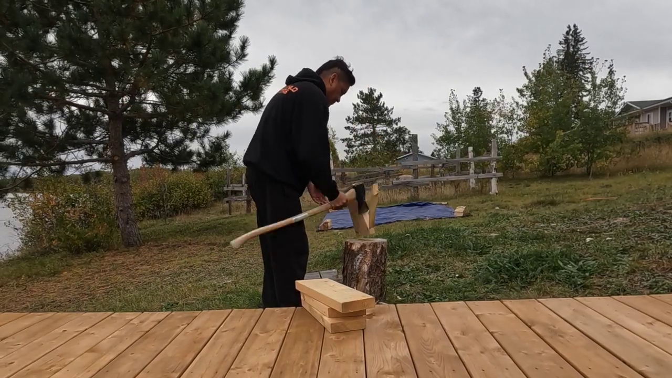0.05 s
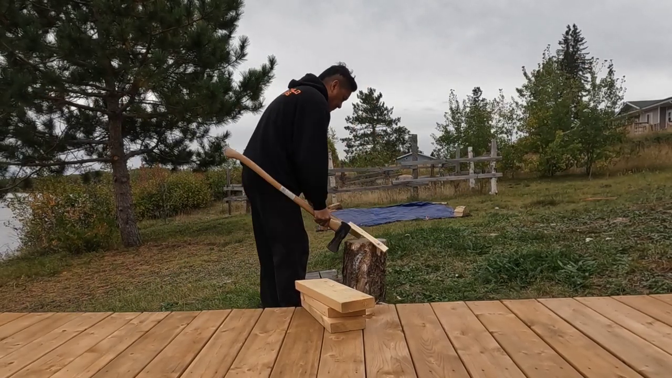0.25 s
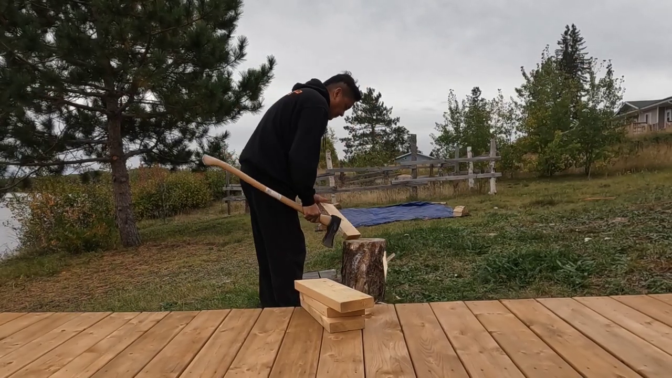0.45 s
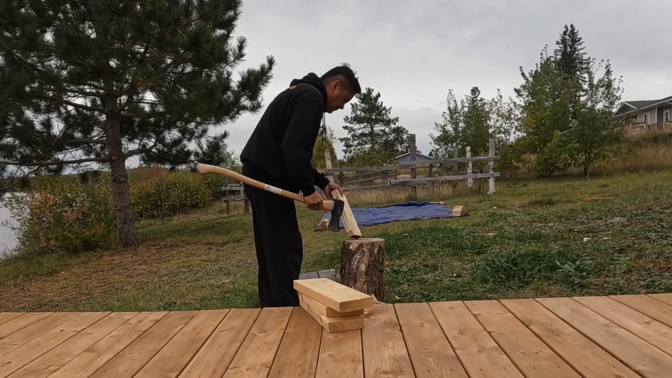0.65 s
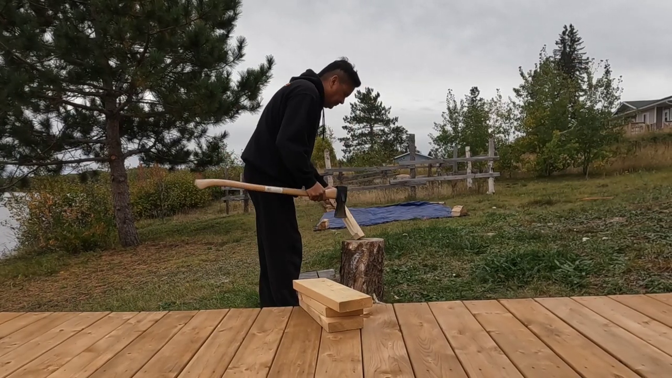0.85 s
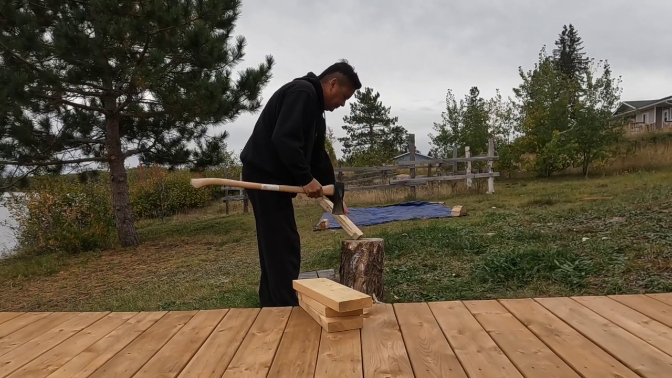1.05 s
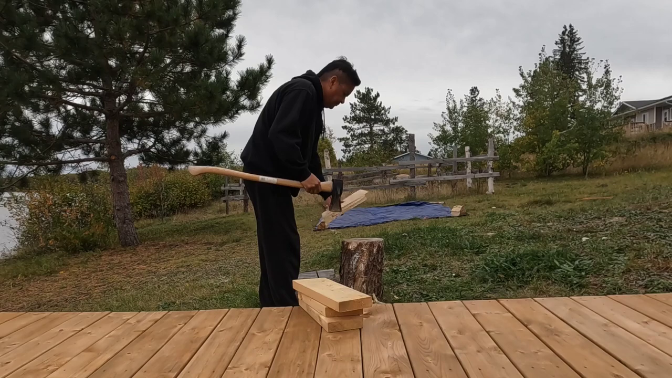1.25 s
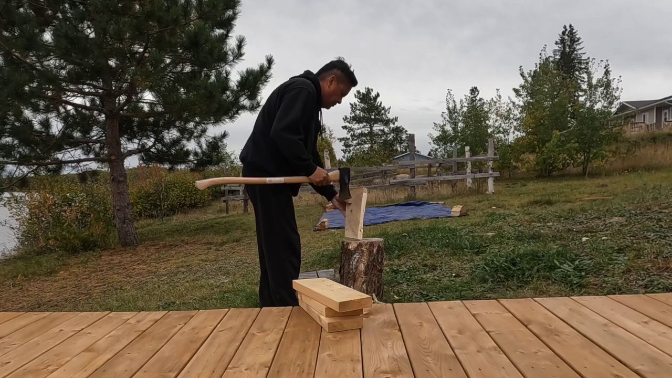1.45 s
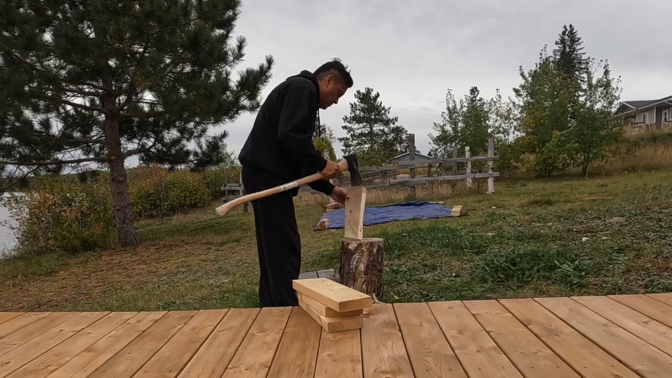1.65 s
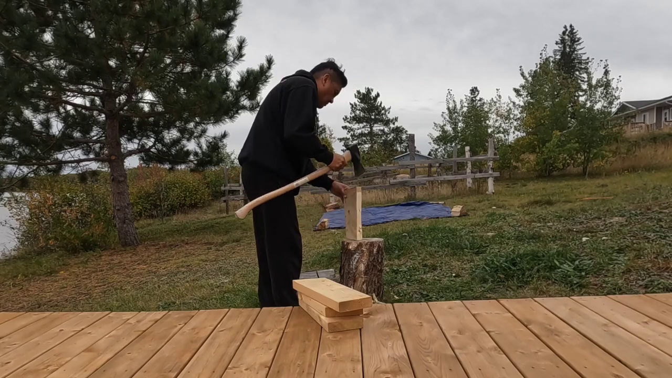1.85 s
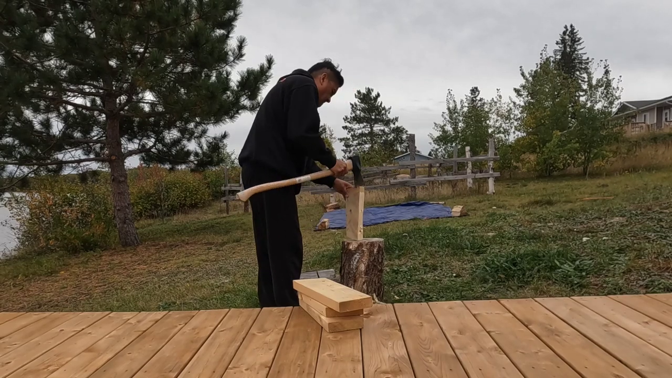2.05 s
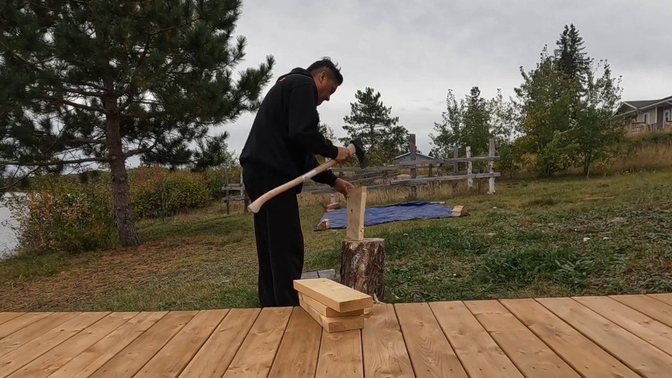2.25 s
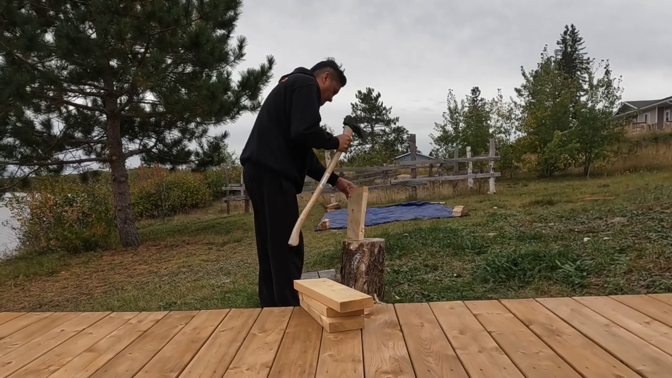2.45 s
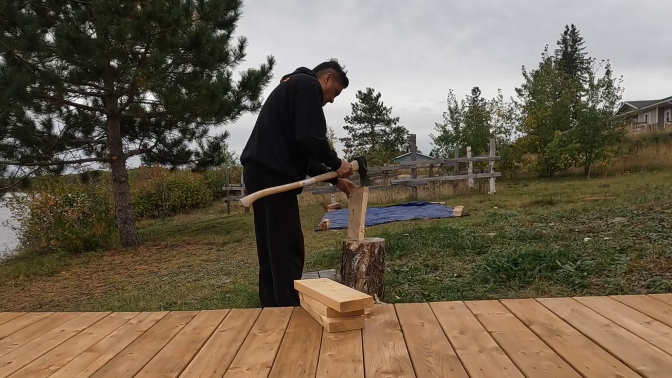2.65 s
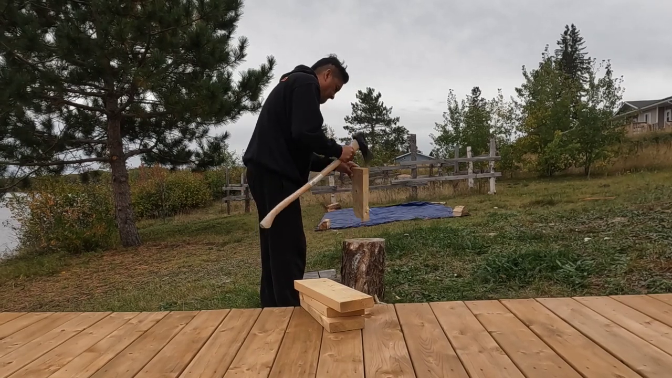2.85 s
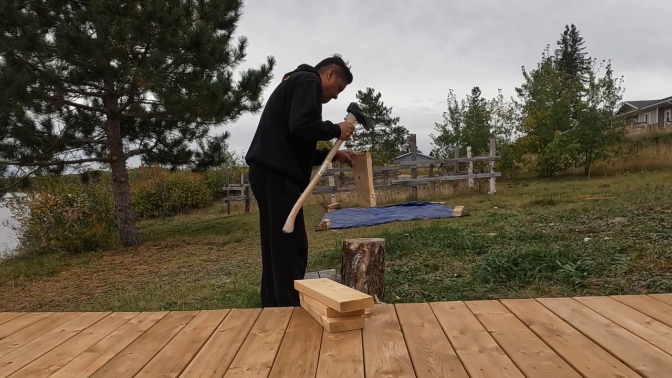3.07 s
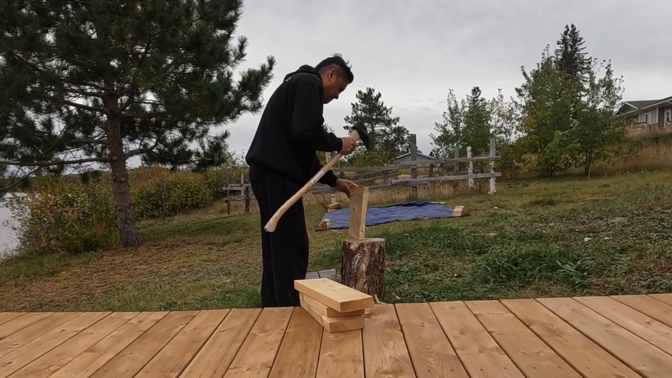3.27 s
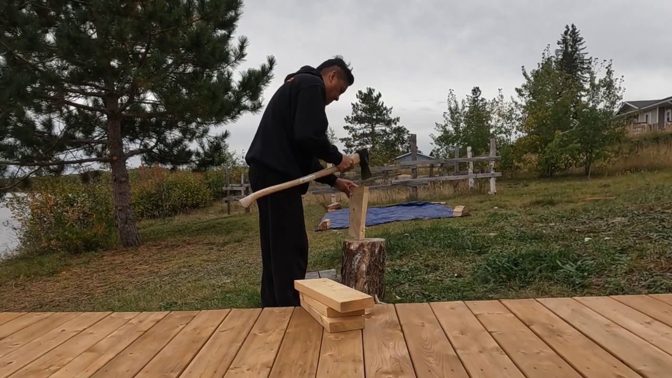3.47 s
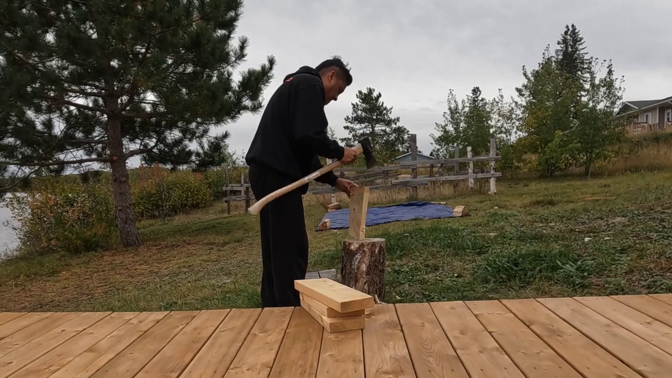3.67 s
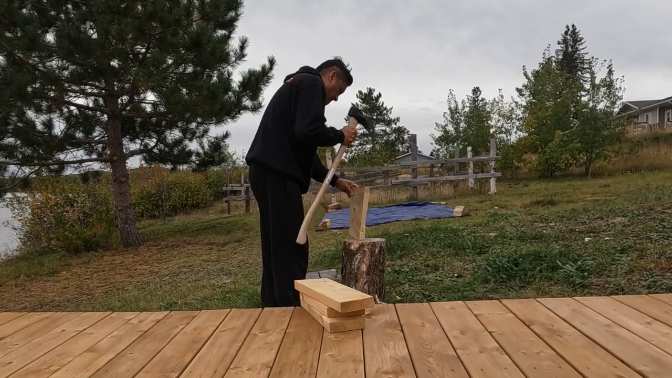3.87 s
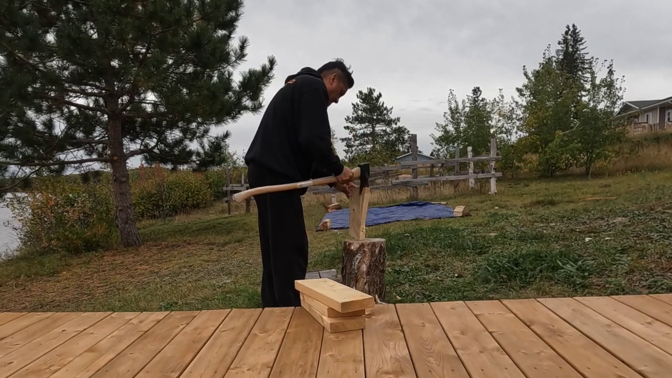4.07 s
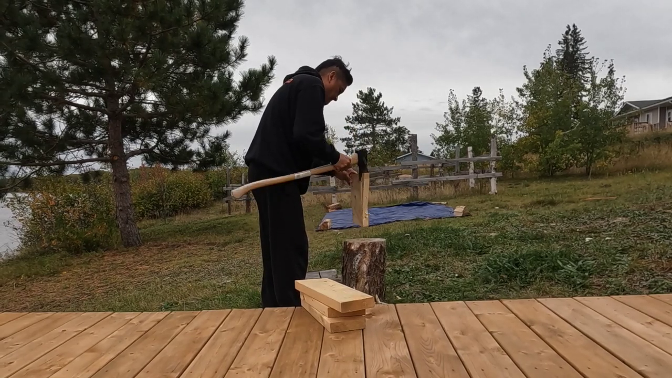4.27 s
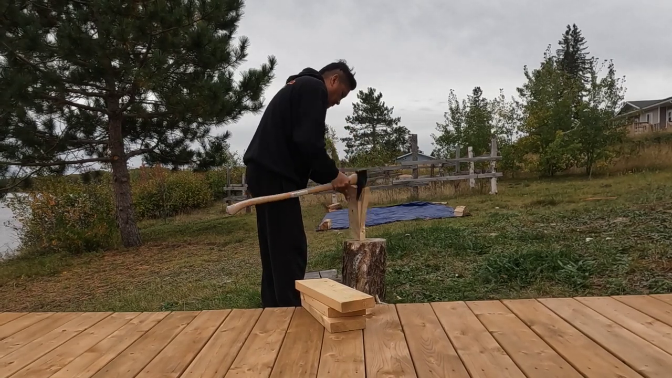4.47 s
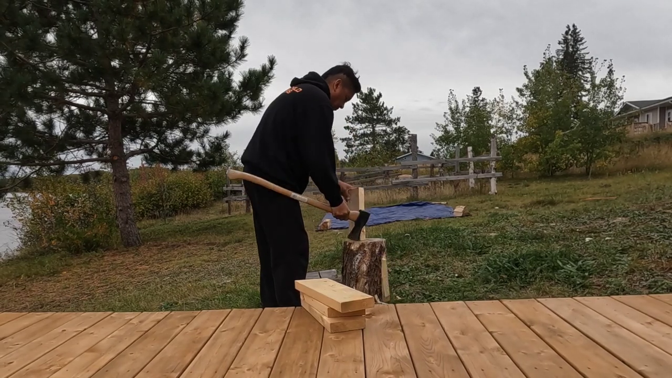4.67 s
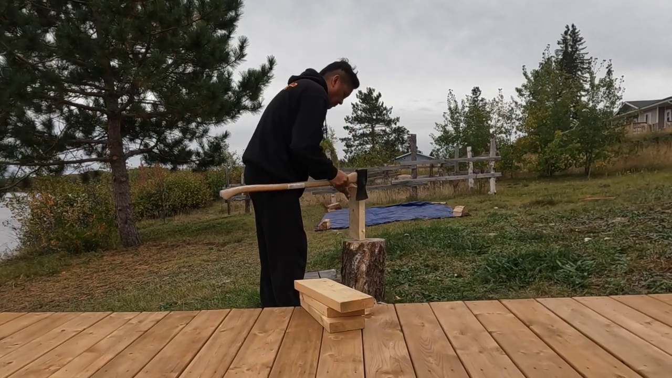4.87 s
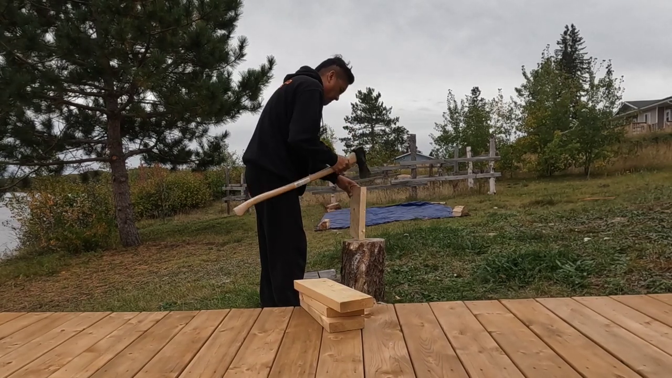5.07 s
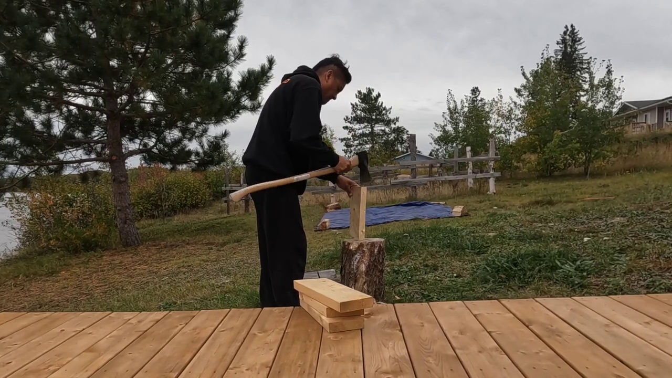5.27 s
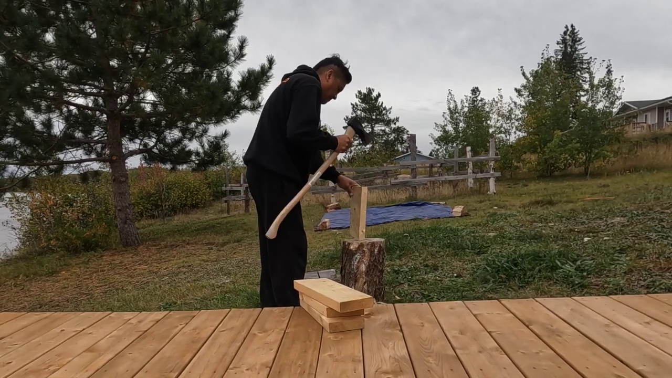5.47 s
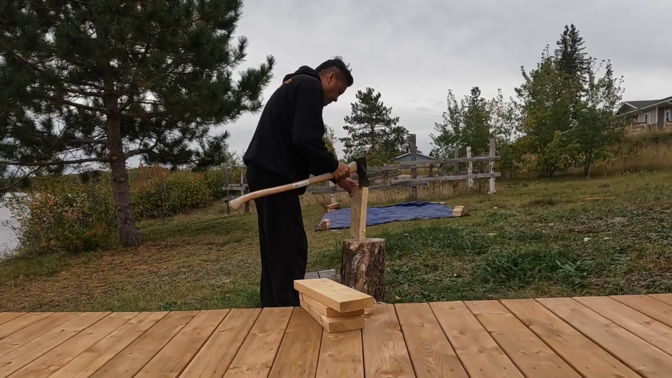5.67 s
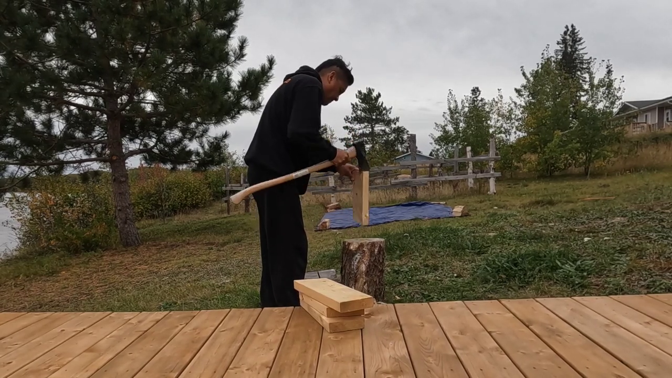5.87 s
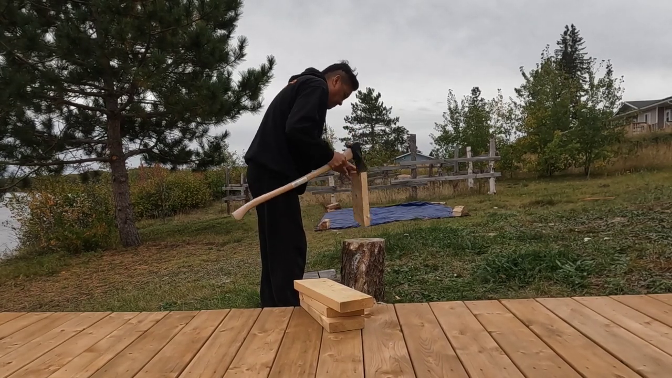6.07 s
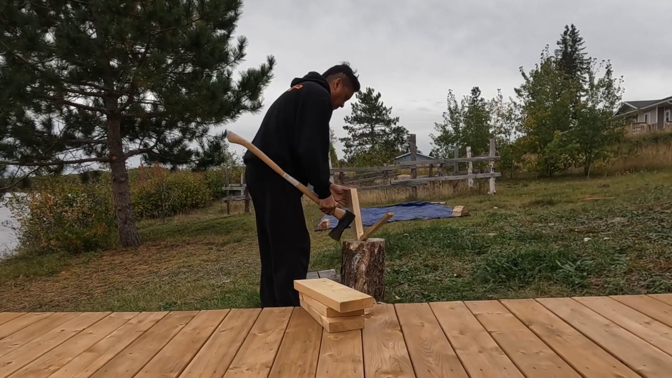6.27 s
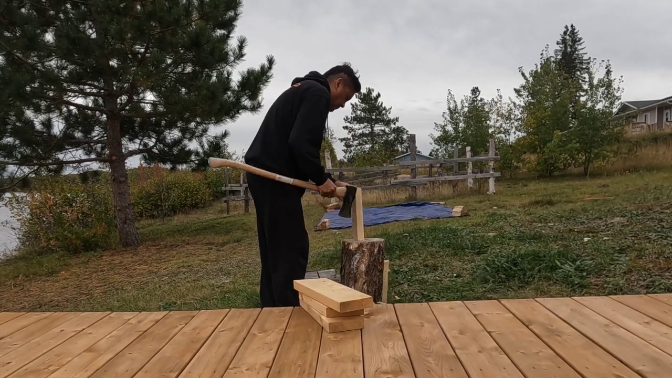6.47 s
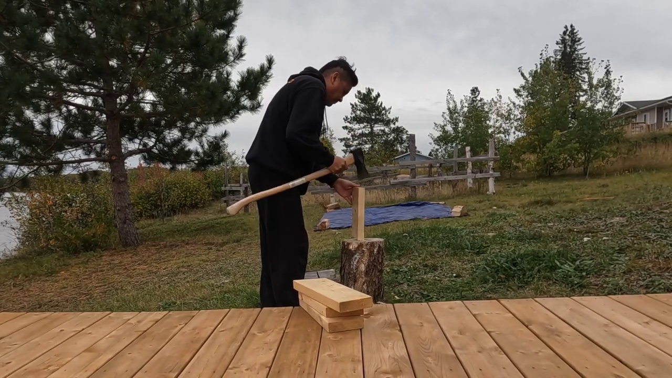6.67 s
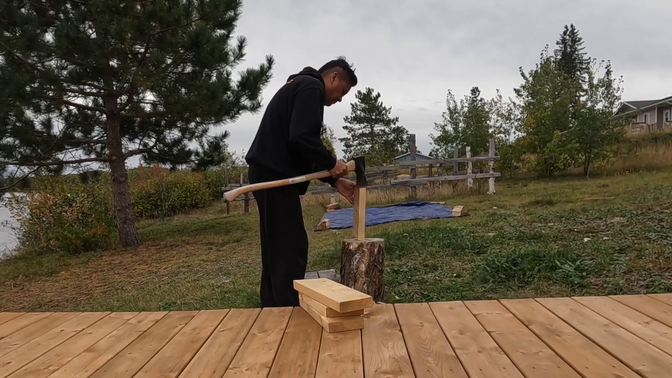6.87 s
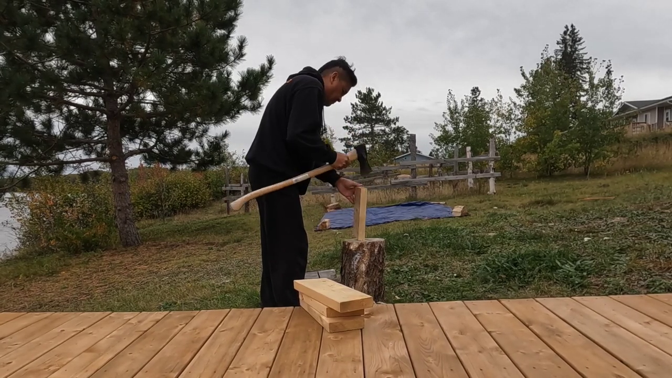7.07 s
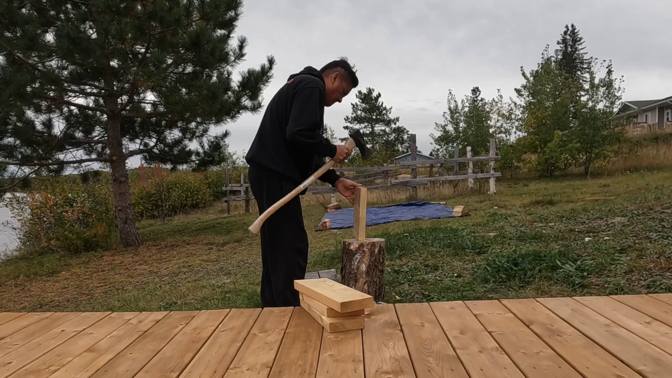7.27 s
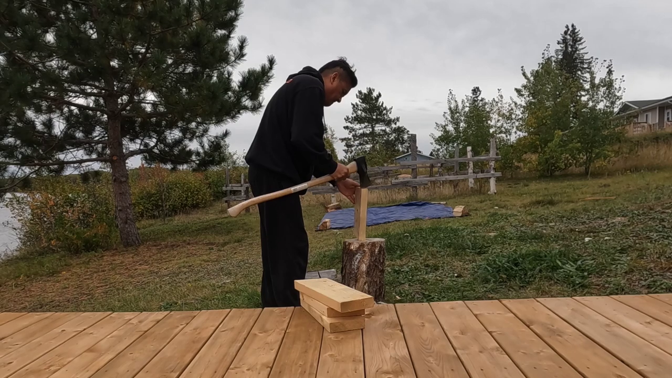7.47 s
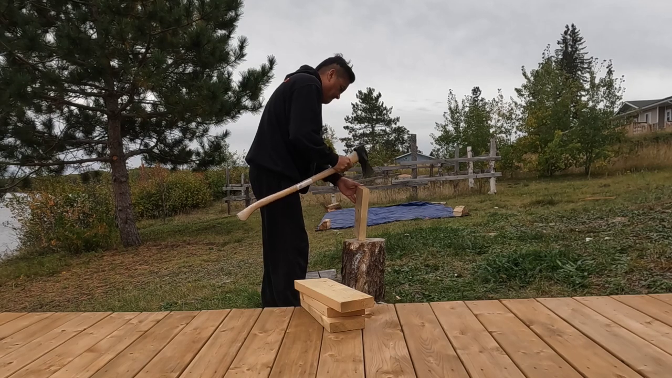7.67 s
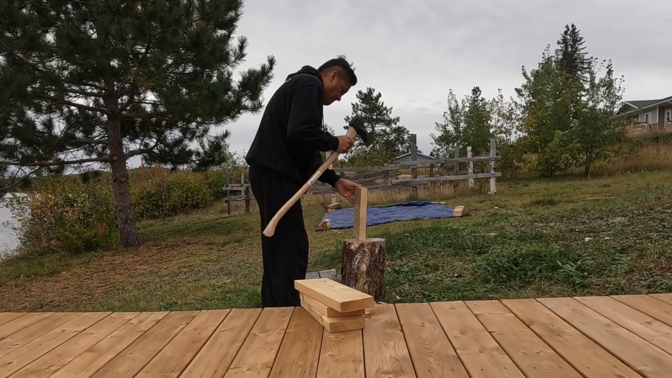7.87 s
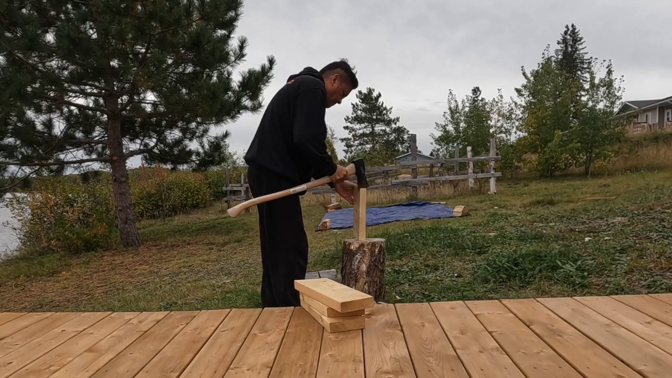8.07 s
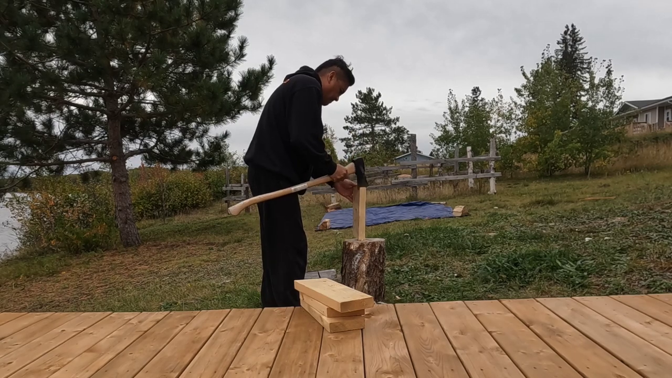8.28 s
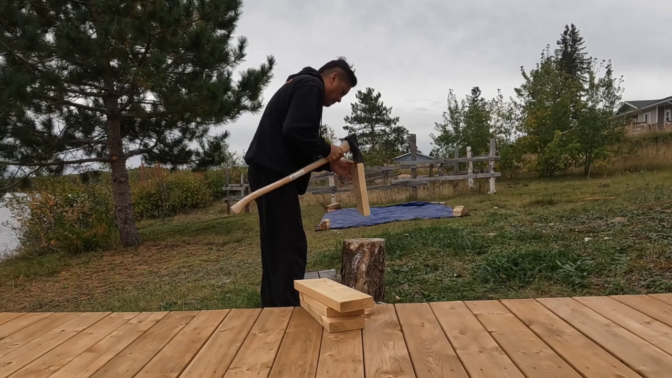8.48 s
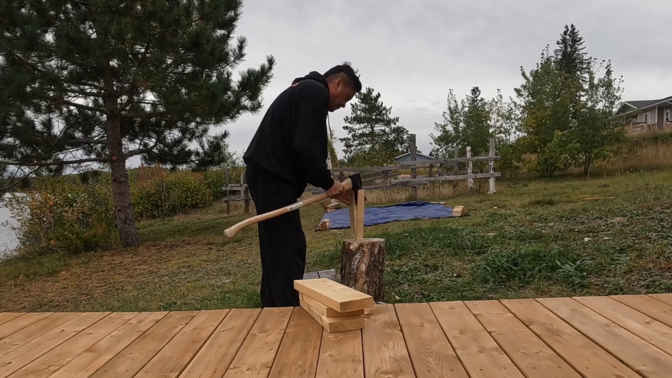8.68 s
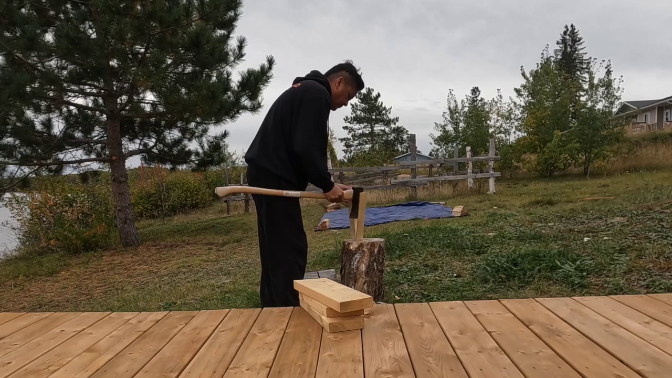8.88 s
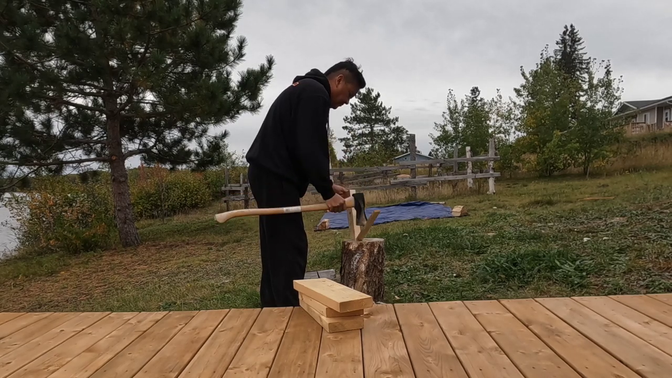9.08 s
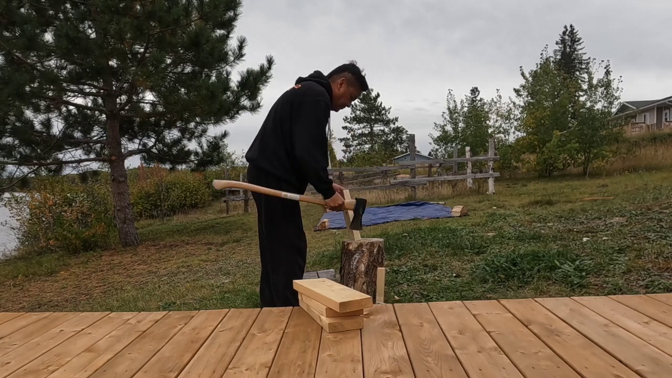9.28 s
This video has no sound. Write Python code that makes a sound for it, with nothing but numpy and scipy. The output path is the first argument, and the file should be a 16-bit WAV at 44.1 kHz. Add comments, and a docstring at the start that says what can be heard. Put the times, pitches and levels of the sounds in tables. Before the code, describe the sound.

Close, dry outdoor wood chopping with only thin scattered reflections. At about 0.15 s a hard full-bodied crack splits the board, with a short rasp and faint steel ring; pieces clatter until 0.7. Light taps, soft thuds and rustling fill 0.9-2.3 as wood is handled. A crisp bite lands at 2.7, a clack and dry rub at 3.0, then a duller knock at 3.6. A brighter splitting crack comes at 4.15, another at 4.6, followed by loud clacking and thuds to 5.0. A tap at 5.25 and a chop at 5.75 lead to a sharp split at 6.2 and a ringing stick knock at 6.6. Drier blows fall at 7.5 and 8.15, then a strong splintering crack at 8.75, with pieces tumbling and a bright clack near 9.1. Low uneven rumble and ground thumps continue beneath; the sound starts mono and gradually widens after 3.5.

```python
"""Outdoors, beside a wooden deck: an axe splits a dry board into kindling on a stump.
Chops, splits and clacks are dying swarms of noise snaps that drive resonators at the wood's modes.
Thumps are swept low sines plus shuddering noise, thuds are short cosine swings, a steel ring is decaying sines.
Rasps, rustle, hush, rumble and soft bumps are coloured noise under level curves; sparse outdoor scatter
answers the wood hits."""
import sys
import numpy as np
from scipy import signal
from scipy.fft import rfft, irfft, next_fast_len
from scipy.io import wavfile

SR = 44100
rng = np.random.default_rng(int(sys.argv[2]) if len(sys.argv) > 2 else 0)


def file_out(sig):
    """Save sig as 16-bit WAV at sys.argv[1]."""
    # one column per channel
    cols = np.atleast_2d(sig).T
    # limit, then scale
    lim = np.clip(cols, -1, 1)
    pcm = np.round(lim * 32767).astype(np.int16)
    wavfile.write(sys.argv[1], SR, pcm)


N = 411435
TIME = np.arange(N) / SR


def from_db(db):
    """dB to amplitude factor."""
    return 10 ** (np.asarray(db) / 20)


def rms_one(x):
    """Scale to rms 1."""
    return x / np.sqrt(np.mean(x ** 2) + 1e-20)


def add(track, s, sound):
    """Mix a sound in from time s."""
    at = round(s * SR)
    track[..., at:at + sound.shape[-1]] += sound[..., :N - at]


def band(x, low_hz, high_hz):
    """Band-pass, Butterworth."""
    return signal.sosfilt(signal.butter(2, [low_hz, high_hz], "band", fs=SR, output="sos"), x)


def resonate(x, hz, width_hz):
    """Two-pole resonance, about unity gain at its peak."""
    r = np.exp(-np.pi * width_hz / SR)
    feedback = [1, -2 * r * np.cos(2 * np.pi * hz / SR), r * r]
    return signal.lfilter(np.array([1, 0, -1]) * (1 - r * r) / 2, feedback, x)


def coloured(x, colour):
    """Shape a noise by a dB curve over log frequency; rms 1."""
    hz, db = np.transpose(colour)
    size = next_fast_len(x.shape[-1])
    f = np.maximum(np.fft.rfftfreq(size, 1 / SR), 1)
    gain = from_db(np.interp(np.log(f), np.log(hz), db, left=-90, right=-90))
    return rms_one(irfft(rfft(x, size) * gain, size)[..., :x.shape[-1]])


def stereo_noise(colour, side_db, grain_db=0):
    """Mid/side noise with a weaker side; uneven grain makes it crackle."""
    grain = from_db(grain_db * rng.standard_normal(N))
    mid, side = coloured(rng.standard_normal((2, N)) * grain, colour)
    return rms_one(mid + from_db(side_db) * side * np.array([[1], [-1]]))


def flutter(per_s, depth_db):
    """Random gain: per_s new values a second, joined by lines, depth_db scales them."""
    steps = rng.standard_normal(N)
    return from_db(depth_db * np.interp(TIME * per_s, np.arange(N), steps))


SWELLS_PER_S, SWELL_DB = 10, 3
RUMBLE_GAIN_DB, BUMP_GAIN_DB = 6, 7
# deep rumble spectrum: (f/Hz, relative level/dB)
RUMBLE_SPECTRUM = [(15, -1.5), (30, 0.5), (50, -4.5), (75, -6.5), (110, -12.5), (170, -42)]
# deep rumble curve: (t/s, level/dB before RUMBLE_GAIN_DB)
RUMBLE_LEVEL = [(0.0, -48.5), (0.28, -46), (0.8, -59.5), (1.12, -36), (1.35, -50), (2.6, -44),
                (3.38, -61.5), (3.63, -51), (4.41, -46), (4.65, -39.5), (6.42, -47.5), (6.55, -47.5),
                (7.38, -50), (7.67, -38.5), (8.18, -47), (8.39, -36), (8.94, -39.5), (9.33, -38.5)]


def rumble():
    """Deep noise in uneven swells."""
    level = from_db(np.interp(TIME, *np.transpose(RUMBLE_LEVEL)) + RUMBLE_GAIN_DB)
    return level * flutter(SWELLS_PER_S, SWELL_DB) * stereo_noise(RUMBLE_SPECTRUM, side_db=-8.0)


# soft bumping spectrum: (f/Hz, relative level/dB)
BUMP_SPECTRUM = [(50, -9), (90, -7), (130, -6), (200, -12.5), (300, -22), (550, -37.5), (1000, -58.5)]
# soft bumping curve: (t/s, level/dB before BUMP_GAIN_DB)
BUMP_LEVEL = [(0.0, -66.5), (0.26, -57), (0.96, -68), (1.14, -48), (1.38, -60.5), (2.73, -62.5),
              (3.22, -68), (4.81, -57), (5.53, -65.5), (6.18, -69), (6.83, -60.5), (7.4, -73),
              (7.72, -63.5), (7.97, -63.5), (8.91, -55), (9.33, -71)]


def soft_bumps():
    """Low noise in uneven swells."""
    level = from_db(np.interp(TIME, *np.transpose(BUMP_LEVEL)) + BUMP_GAIN_DB)
    return level * flutter(SWELLS_PER_S, SWELL_DB) * stereo_noise(BUMP_SPECTRUM, side_db=-5.0)


HUSH_DB = -69
# spectrum of foliage, grass and cloth: (f/Hz, relative level/dB)
RUSTLE_SPECTRUM = [(290, -40), (500, -8.5), (1030, -2), (1480, 1.5), (1640, -1), (1870, -3.5), (2040, -4),
                   (2160, -3), (4600, -7), (7310, -11.5), (9090, -24), (12300, -13.5), (16000, -36.5)]


def hush():
    """Steady noise of foliage."""
    return from_db(HUSH_DB) * stereo_noise(RUSTLE_SPECTRUM, side_db=-1.5)


RUSTLE_ATTACK_S, RUSTLE_RELEASE_S, RUSTLE_GAIN_DB = 0.021, 0.063, -3.5
# pieces are handled or fall: (start t/s, length/s, level/dB before RUSTLE_GAIN_DB)
RUSTLE_EVENTS = [(0.249, .27, -59), (0.721, 0.11, -58.5), (1.274, 0.96, -66), (2.542, 0.53, -68),
                 (4.225, 0.91, -62.5), (5.416, .24, -63.5), (5.951, 0.69, -67), (8.949, 0.46, -54.5)]


def rustle():
    """Clothes and grass: crackling noise, held for each event, then released exponentially."""
    stir = np.zeros(N)
    for s, length_s, db in RUSTLE_EVENTS:
        attack = np.clip((TIME - s) / RUSTLE_ATTACK_S, 0, 1)
        release = np.exp(-np.maximum(TIME - s - length_s, 0) / RUSTLE_RELEASE_S)
        stir += from_db(db) * attack * release
    noise = stereo_noise(RUSTLE_SPECTRUM, side_db=-3.0, grain_db=6.5)
    return from_db(RUSTLE_GAIN_DB) * stir * flutter(per_s=45, depth_db=5) * noise


# scatter from deck, grass and trees: (f/Hz, relative level/dB)
SCATTER_SPECTRUM = [(150, -7), (500, -3.5), (900, -12), (1400, -8.5), (3400, -4.5), (7000, 0), (10000, 5),
                    (15000, -10.5)]


def yard(x, wet_db=-22, t60_s=0.33, treble_t60_s=.14, onset_s=0.0035, echo_db=-30, echo_s=0.043):
    """Thin scatter, partly different per ear, plus a blurred wall echo; grass and leaves swallow treble first."""
    t = TIME[:SR // 2]
    sparse = rng.standard_normal((3, len(t))) * from_db(7 * rng.standard_normal(len(t)))
    echoes = coloured(sparse[:2] + sparse[2], SCATTER_SPECTRUM)   # the third noise is common to both ears
    echoes = echoes * flutter(per_s=480, depth_db=5.0)[:len(t)]
    dull = signal.sosfilt(signal.butter(2, 4200, fs=SR, output="sos"), echoes)
    bright = signal.sosfilt(signal.butter(2, 4200, "high", fs=SR, output="sos"), echoes)
    decaying = dull * from_db(-60 * t / t60_s) - bright * from_db(-60 * t / treble_t60_s)
    scatter = decaying * (1 - np.exp(-t / onset_s))
    wall = dull * np.exp(-((t - echo_s) / 0.0035) ** 2)
    response = from_db(wet_db) * scatter / np.linalg.norm(scatter[0])
    response = response + from_db(echo_db) * wall / np.linalg.norm(wall[0])
    return signal.fftconvolve(x[None], response, axes=1)[:, :N]


# feet and falling sticks on the turf: (t/s, relative level/dB, f/Hz)
TURF_THUDS = [(1.074, -20, 64.9), (1.123, -26, 147), (1.172, -25.5, 161), (3.44, -34, 131),
              (3.664, -31, 139), (4.718, -20.5, 171), (4.776, -18.5, 103), (4.84, -18.5, 178),
              (6.795, -23, 149), (7.821, -20.5, 61), (7.913, -19.5, 56.5), (8.371, -21.5, 62.7),
              (8.456, -13.5, 64), (8.474, -13, 96.3), (8.494, -20.5, 128), (8.522, -17.5, 174),
              (8.577, -19, 58), (8.969, -16.5, 61), (9.019, -20.5, 112), (9.193, -23.5, 133)]


def thuds():
    """A soft contact gives one swing of pressure and a small rebound."""
    out, t = np.zeros(N), np.arange(-SR // 20, SR // 20) / SR
    for s, db, hz in TURF_THUDS:
        cycles = t * hz
        swing = np.cos(2 * np.pi * cycles) * np.exp(-np.hypot(cycles, .08) / 0.5)
        add(out, s + t[0], -from_db(db) * swing)
    return out


def thumps(push_hz=56, push_s=.024, wave_hz=76, sweep_hz=45, sweep_s=.05, swell_s=.06, deck_db=-6, deck_s=0.06):
    """A push, then a ground wave whose higher tones lead, and the deck shudders on."""
    out, t = np.zeros(N), TIME[:SR]
    for s, *_, db in BITES + BOARD_TAPS:
        push_envelope = np.exp(-t / push_s) * (1 - np.exp(-t / 0.00037))
        push = 2.0 * np.sin(2 * np.pi * push_hz * (t - .003)) * push_envelope
        hz = (wave_hz + sweep_hz * np.exp(-t / sweep_s)) * from_db(rng.normal(0, 1.0))
        wave_envelope = (t / swell_s * np.exp(1 - t / swell_s)) ** 2
        wave = 1.1 * np.sin(2 * np.pi * np.cumsum(hz) / SR) * wave_envelope
        shudder = rms_one(band(band(rng.standard_normal(SR), 54, 140), 54, 140))
        deck = shudder * t / deck_s * np.exp(1 - t / deck_s)
        add(out, s, from_db(db) * (push + wave + from_db(deck_db) * deck))
    return out


TEAR_DELAY_S, TEAR_S, TEAR_FALL_DB = .03, .075, 13.5   # fibres rub along the blade after each bite
TEAR_TREBLE_DB, RASP_TREBLE_HZ = -2.5, 4500
# short dry rubbing strokes: (start t/s, end t/s, start level/dB, end level/dB, treble/dB re stroke)
DRY_RUBS = [(0.13, 0.16, -38.5, -26.5, -12), (0.197, 0.25, -47, -48, -10), (3.014, 3.104, -45, -40.5, -2),
            (3.54, 3.593, -45, -37, -4.5), (3.597, 3.654, -40, -40.5, 3.5),
            (4.067, 4.168, -64.5, -51.5, 5.5)]
# dry friction spectrum: (f/Hz, relative level/dB)
RASP_SPECTRUM = [(120, -48.5), (200, 4.5), (509, -8), (647, 2), (735, -4), (1000, 2), (1270, -3),
                 (2960, -1.5), (9930, -16), (12400, -8), (16000, -27.5)]


def rasps(edge_s=0.018):
    """Short strokes of dry friction that catch and slip, coloured by the board's resonances."""
    level, treble = np.zeros((2, N))
    tears = []
    for s, *_, db, _ in BITES:
        start = s + TEAR_DELAY_S
        tears.append((start, start + TEAR_S, db, db - TEAR_FALL_DB, TEAR_TREBLE_DB))
    for start, end, first_db, last_db, treble_db in DRY_RUBS + tears:
        gate = np.clip(np.minimum(TIME - start, end - TIME) / edge_s + .5, 0, 1)
        stroke = gate * from_db(np.interp(TIME, [start, end], [first_db, last_db]))
        level += stroke
        treble += from_db(treble_db) * stroke
    slips = flutter(per_s=300, depth_db=3.5) * stereo_noise(RASP_SPECTRUM, side_db=-10, grain_db=7)
    rings = sum(from_db(db + 1.5) * resonate(slips, hz, width_hz) for hz, width_hz, db in BOARD_MODES)
    rub = rms_one(slips + rings)
    dull = signal.sosfiltfilt(signal.butter(1, RASP_TREBLE_HZ, fs=SR, output="sos"), rub)
    return level * dull + treble * (rub - dull)


# steel head modes: (f/Hz, level/dB re hit, t60/s)
STEEL_MODES = [(3494, -14, .25), (4760, -2, .14), (4996, -9.5, .2), (8380, -20.5, .22), (9960, -7, 0.23),
               (13900, -19.5, .22)]
# blows that leave the head ringing: (t/s, level/dB)
HEAD_HITS = [(0.154, -40)]


def axe_head():
    """The steel rings on as a sum of decaying sines."""
    out, t = np.zeros(N), TIME[:SR // 2]
    for s, hit_db in HEAD_HITS:
        for hz, db, t60_s in STEEL_MODES:
            add(out, s, from_db(hit_db + db - 60 * t / t60_s) * np.sin(2 * np.pi * hz * t))
    return out


HOLLOW = .7   # share of the low mids that a small board fails to radiate
# edges of the registers knock, body, crack, snap: f/Hz
REGISTER_EDGES_HZ = [220, 800, 2200, 5500, 15000]
# board modes, varied per hit: (nominal f/Hz, width/Hz, relative level/dB)
BOARD_MODES = [(333, 92, -6.5), (520, 140, -11), (610, 50, -5.5), (1154, 37, -11), (1730, 110, -5),
               (2010, 170, -6), (2930, 490, -4), (3420, 19, -3.5), (3690, 95, -6), (4550, 28, -2),
               (5600, 190, -9), (7020, 360, -3)]


def wood_hit(row, rise_s, grain_db, click, board_db, ring_db, ring_q, tear_db, tear_s):
    """A click and a dying swarm of fibre snaps drive the wood's modes.
    Returns the start/s and two sounds: direct, with modes, and spread, the smoother sum of other directions."""
    s, decay_s, low_hz, high_hz, *levels_db = row
    lead_s = .02
    t = np.arange(-round(lead_s * SR), round(.11 * SR)) / SR
    swarm = np.exp(-np.abs(t) / np.where(t < 0, rise_s, decay_s))
    # fibres creak first and tear on afterwards
    tearing = from_db(tear_db) * np.exp(-np.abs(t) / np.where(t < 0, 2 * rise_s, tear_s))
    knots = t[::100]
    clumps = from_db(5 * np.interp(t, knots, rng.standard_normal(len(knots))))
    grain = rng.standard_normal(len(t)) * from_db(grain_db * rng.standard_normal(len(t)))
    force = (swarm + tearing * clumps) * grain
    force *= np.where(t < -2.5 * rise_s, from_db(-4), 1)   # only a creak before the contact begins
    force[np.argmin(np.abs(t))] += click * np.linalg.norm(force)

    wood = force - HOLLOW * resonate(force, 560, 560)   # low tones radiate only at the modes
    for hz in (low_hz, high_hz):
        wood += from_db(ring_db) * resonate(force, hz, hz / ring_q)
    detune = from_db(rng.normal(0, 0.32))   # board mode pitches vary slightly at random from hit to hit
    for mode_hz, width_hz, db in BOARD_MODES:
        gain = from_db(board_db + db + rng.normal(0, 2))
        wood += gain * resonate(force, mode_hz * detune, width_hz)

    out = 0
    for k, db in enumerate(levels_db):
        part = band(np.array([wood, force]), REGISTER_EDGES_HZ[k], REGISTER_EDGES_HZ[k + 1])
        loudness = np.sqrt(np.sum(part ** 2, axis=1, keepdims=True) / (.01 * SR))   # energy over 10 ms
        out = out + (-1) ** k * from_db(db) * part / loudness
    return s - lead_s, out


OWN_TONE_DB = 4   # a long stick favours the knock, a short one the body
# contact spectrum, knock, body, crack, snap: relative level/dB
CONTACT_REGISTERS_DB = [0.5, -4, 0, -21]


def stick_contact(s, decay_s, low_hz, high_hz, db, bright_db):
    """wood_hit row: bright_db tilts the registers; the one with the stick's lowest tone stands out."""
    own_db = OWN_TONE_DB * np.sign(REGISTER_EDGES_HZ[1] - low_hz) * np.array([1, -1, 0, 0])
    register = np.arange(len(CONTACT_REGISTERS_DB))
    levels_db = db + own_db + CONTACT_REGISTERS_DB + bright_db * (register - register.mean())
    return (s, decay_s, low_hz, high_hz, *levels_db)


TICKS_PER_S, TICK_DB, TICK_DECAY_S = 6, -57.5, .003   # TICK_DB: mean, before CLACK_GAIN_DB
# tick rings at middle size: f/Hz
TICK_MODES_HZ = [1200, 3130]


def handling_ticks():
    """Faint touches at random moments of each rustle, random in pitch and force."""
    rows = []
    for start, length_s, _ in RUSTLE_EVENTS:
        for when, size, force in rng.random((round(TICKS_PER_S * length_s), 3)):
            s = min(start + when * length_s, TIME[-1])
            rings_hz = np.multiply(TICK_MODES_HZ, 2 ** (size - .5))
            db = TICK_DB + 10 * (force - .5)
            rows.append(stick_contact(s, TICK_DECAY_S, *rings_hz, db, bright_db=2.0))
    return rows


CLACK_GAIN_DB = -5.5
# sticks and blade knock: (t/s, decay/s, low ring f/Hz, high ring f/Hz, level/dB before CLACK_GAIN_DB,
# brightness/dB per register)
STICK_CLACKS = [(0.308, 0.0068, 1090, 2220, -40, 2.5), (0.3752, 0.0088, 1020, 1600, -39, -1),
                (0.494, 0.0036, 1420, 3340, -49, -4), (0.505, 0.00079, 1260, 3420, -45.5, 5.5),
                (0.668, 0.02, 1030, 5150, -57, 6.5), (0.723, 0.019, 1034, 1670, -47.5, 0.5),
                (1.271, 0.012, 1080, 2260, -42.5, -1.5), (1.474, 0.0046, 1250, 3360, -52.5, 5.5),
                (1.568, 0.0041, 1180, 1530, -51, 2), (1.5925, 0.0028, 1080, 2190, -47, -0.5),
                (1.752, 0.0045, 990, 3500, -57.5, -1), (1.862, 0.022, 920, 2480, -50.5, -1),
                (1.997, 0.0027, 1440, 4430, -54.5, 7), (2.12, 0.0045, 1250, 2200, -55, 0),
                (2.154, 0.0035, 1280, 3790, -52, 7.5), (2.237, 0.0024, 1270, 3700, -52, -1),
                (2.28, 0.008, 1400, 3620, -49, 6.5), (3.034, 0.014, 1320, 2170, -36, 3.5),
                (3.123, .018, 1090, 2800, -49, -3), (3.604, 0.012, 1040, 3970, -38, -1),
                (3.912, 0.0025, 1420, 1640, -65, -10.5), (4.119, .02, 1450, 3600, -42, 7),
                (4.237, 0.0059, 1380, 1940, -45, 6), (4.269, 0.013, 1390, 1540, -47.5, -4),
                (4.294, 0.024, 960, 1500, -47, -6.5), (4.3684, 0.0047, 1017, 1400, -36, -8.5),
                (4.702, 0.00088, 644, 2920, -30.5, 3), (4.761, 0.016, 1120, 2480, -41.5, 2.5),
                (4.8249, 0.0045, 1076, 1800, -26, 0), (4.843, 0.0053, 457, 1890, -42, 5),
                (4.954, 0.0048, 1280, 1730, -40, -5), (5.049, 0.0063, 1310, 3480, -59.5, 17.5),
                (6.367, 0.0047, 426, 3220, -52.5, -2.5), (6.43, 0.0023, 1390, 2970, -58.5, 7),
                (6.469, 0.0013, 770, 3900, -53.5, 3), (6.582, 0.0077, 1120, 1880, -30, 2.5),
                (9.004, 0.013, 970, 1540, -48, -3), (9.051, 0.0076, 610, 1640, -48, -0.5),
                (9.072, .001, 1060, 3530, -55, 1), (9.128, 0.0016, 1510, 2860, -31, 13.5)]
# board stood on the stump: (t/s, decay/s, level/dB before CLACK_GAIN_DB, relative ground thump/dB)
BOARD_TAPS = [(.948, 0.0027, -48, -35), (2.178, 0.0058, -41, -37.5), (3.393, 0.0099, -51, -44),
              (4.695, 0.0026, -32, -34), (5.262, 0.0064, -39.5, -33.5), (6.791, 0.015, -44, -40),
              (6.987, .0045, -48, -38.5)]
# tap rings: f/Hz
TAP_MODES_HZ = [565, 4200]
# tap spectrum, knock, body, crack, snap: relative level/dB
TAP_REGISTERS_DB = [0, -9.5, -6.5, -15]


def clacks(rise_share=0.23):
    """Light touches of dry wood, clearly ringing; the shorter the contact, the more sudden its start."""
    out = np.zeros((2, N))
    taps = [(s, decay_s, *TAP_MODES_HZ, *np.add(TAP_REGISTERS_DB, db)) for s, decay_s, db, _ in BOARD_TAPS]
    sticks = [stick_contact(*row) for row in STICK_CLACKS]
    for row in taps + sticks + handling_ticks():
        add(out, *wood_hit(row, rise_s=rise_share * row[1], grain_db=3.5, click=0.22, board_db=1.5,
                           ring_db=12, ring_q=13, tear_db=-25.5, tear_s=0.011))
    return from_db(CLACK_GAIN_DB) * out


CHOP_GAIN_DB, SPLIT_KNOCK_HZ = -1.42, 780
# blade bites: (t/s, decay/s, low ring f/Hz, high ring f/Hz, knock/dB, body/dB, crack/dB, snap/dB,
# tearing/dB, relative ground thump/dB); knock to snap before CHOP_GAIN_DB
BITES = [(0.1545, 0.0032, 1400, 2650, -17, -18, -22, -37.5, -43, -35),
         (2.6857, 0.0015, 530, 1680, -31, -28.5, -22.5, -33.5, -52, -28),
         (3.6384, 0.0016, 521, 3760, -32.5, -51, -42, -43, -59.5, -30.5),
         (4.1412, 0.0044, 1210, 4470, -36, -27, -22.5, -41, -44, -32),
         (4.5891, 0.0037, 493, 3700, -25.5, -28.5, -26.5, -43, -43, -29.5),
         (5.764, 0.004, 606, 1840, -36.5, -40, -29, -38.5, -53, -28),
         (6.2335, 0.0014, 451.4, 3060, -23, -23, -30, -27, -50.5, -27),
         (7.4852, 0.0014, 489, 3430, -30.5, -36, -28.5, -31, -72, -23.5),
         (8.1551, 0.0041, 616, 5410, -35, -44, -24.5, -33, -48, -27),
         (8.7572, 0.004, 1420, 4520, -24.5, -33, -19.5, -29.5, -43.5, -31.5)]
# grain gives way ahead of the wedge: (t/s, decay/s, ring f/Hz, level/dB before CHOP_GAIN_DB)
GRAIN_SPLITS = [(0.162, 0.0026, 2644, -27), (2.709, .0034, 6100, -38), (4.146, 0.0044, 4200, -22.5),
                (4.612, 0.0045, 3290, -33), (4.638, 0.0041, 5350, -29.5), (4.652, 0.011, 2430, -35.5),
                (4.668, 0.013, 3100, -41), (6.2397, .006, 3270, -24), (8.764, 0.011, 4110, -20.5),
                (8.793, 0.0028, 3500, -31)]
# split spectrum, knock, body, crack, snap: relative level/dB
SPLIT_REGISTERS_DB = [-13, -9.5, -0.5, -8.5]


def chops():
    """The wedge bites, and on some blows the grain gives way: bursts of snapping fibres ring the board."""
    out = np.zeros((2, N))
    bites = [row[:-2] for row in BITES]
    splits = [(s, decay_s, SPLIT_KNOCK_HZ, hz, *np.add(SPLIT_REGISTERS_DB, db))
              for s, decay_s, hz, db in GRAIN_SPLITS]
    for row in bites + splits:
        add(out, *wood_hit(row, rise_s=.0016, grain_db=3.5, click=0.14, board_db=4.5,
                           ring_db=4, ring_q=9.3, tear_db=-21.5, tear_s=0.013))
    return from_db(CHOP_GAIN_DB) * out


def microphone(x):
    """Two hollows in the treble."""
    x = x - .72 * resonate(x, 9000, 2000)
    return x - .6 * resonate(x, 15000, 2500)


# stump to the right: (f/Hz, left-ear phase lag/rad)
LEFT_EAR_LAG = [(100, .1), (600, .38), (2000, 0.4), (5500, 0.88), (8000, 1), (11000, 0.13)]


def from_the_right(x):
    """The left ear lags in phase."""
    size = next_fast_len(N)
    lag = np.interp(np.fft.rfftfreq(size, 1 / SR), *np.transpose(LEFT_EAR_LAG))
    return np.array([irfft(rfft(x, size) * np.exp(-1j * lag), size)[:N], x])


def scene():
    """Background, ground sounds, and wood hits with their scatter."""
    background = rumble() + soft_bumps() + rustle() + hush()
    direct, spread = microphone(chops() + clacks())
    sway = from_db(-8.5) * thumps() * np.array([[1], [-1]])   # the deck also rocks sideways
    low = (thumps() + thuds()) * from_db([[1.0], [-1.0]]) + sway
    return from_the_right(direct + axe_head()) + yard(spread) + low + rasps() + background


CUTOFF_HZ = 15700
# stereo image opens from mono: (t/s, width 0-1)
IMAGE_WIDTH = [(0, 0), (3.5, 0), (4.15, 0.47), (4.7, 0.7), (5.8, 0.87), (7.5, 1), (9.33, 1)]


def record(dry, diffuse_hz=10200, smear_s=0.00059):
    """The image widens slowly, the highest treble has no clear direction, the top is cut steeply."""
    mid = dry.mean(axis=0)
    wide = mid + np.interp(TIME, *np.transpose(IMAGE_WIDTH)) * (dry - mid)
    size = next_fast_len(N)
    above_hz = np.maximum(np.fft.rfftfreq(size, 1 / SR) - diffuse_hz, 0)
    turn = np.exp(-2j * np.pi * above_hz * smear_s)   # left channel only
    wide[0] = irfft(rfft(wide[0], size) * turn, size)[:N]
    soft = signal.sosfilt(signal.butter(3, 14200, fs=SR, output="sos"), wide)
    return signal.sosfilt(signal.ellip(10, .1, 80, CUTOFF_HZ, fs=SR, output="sos"), soft)


dry = scene()
out = record(dry)
file_out(out)
```